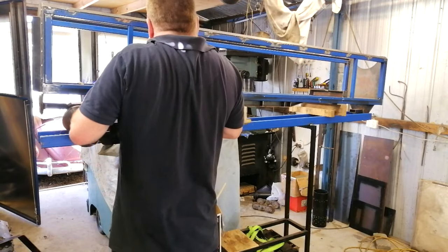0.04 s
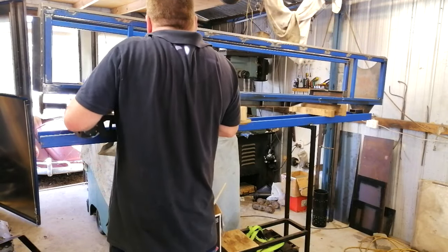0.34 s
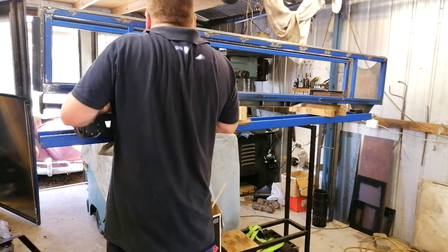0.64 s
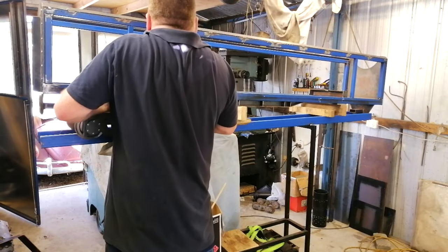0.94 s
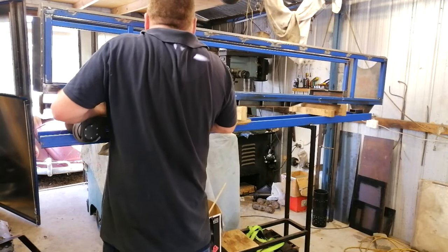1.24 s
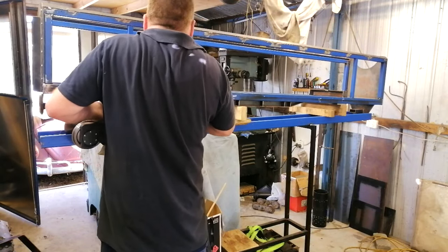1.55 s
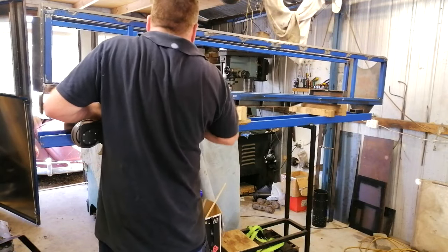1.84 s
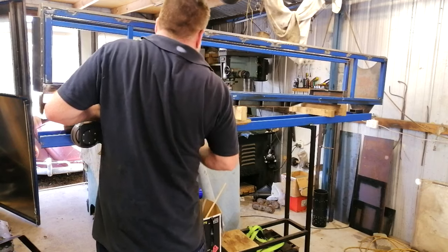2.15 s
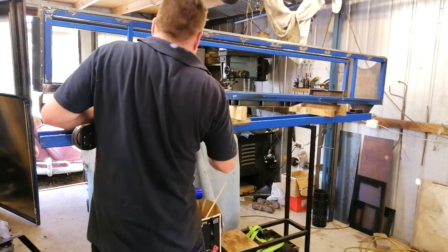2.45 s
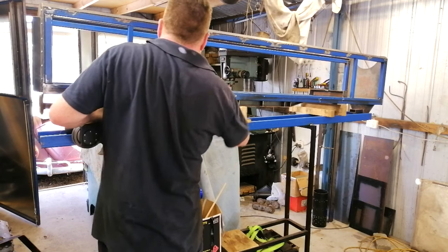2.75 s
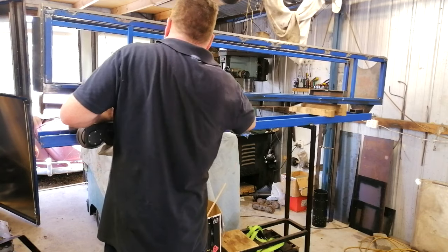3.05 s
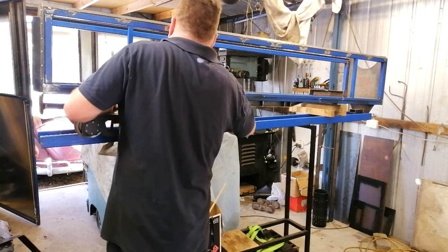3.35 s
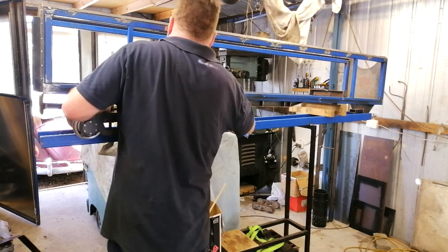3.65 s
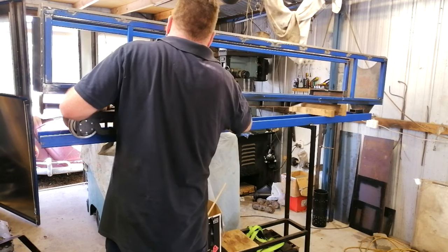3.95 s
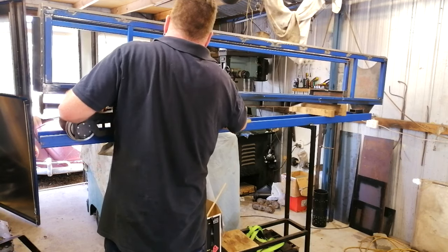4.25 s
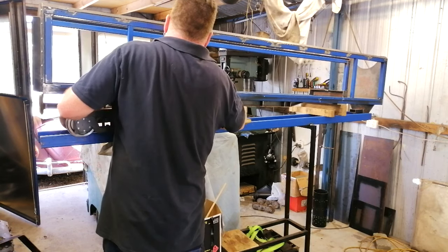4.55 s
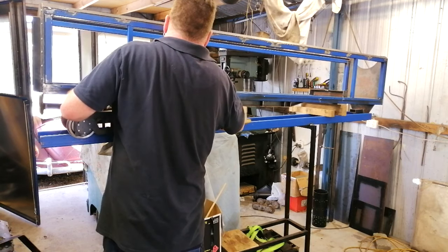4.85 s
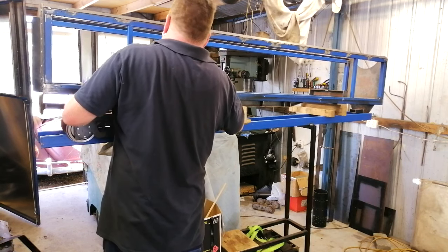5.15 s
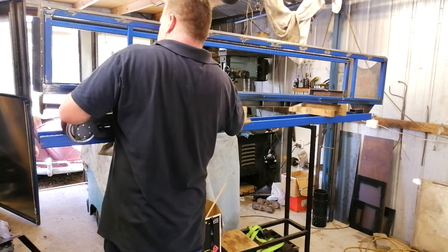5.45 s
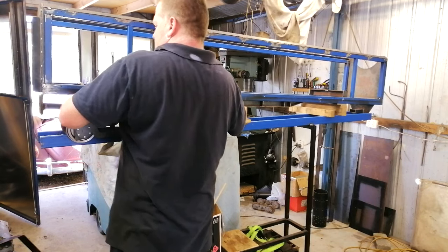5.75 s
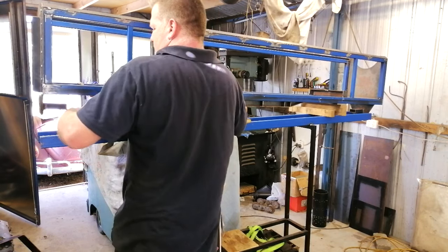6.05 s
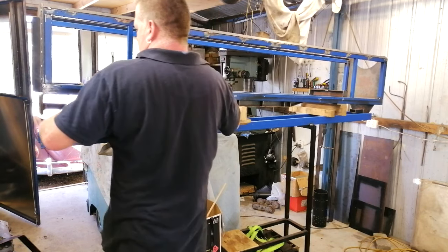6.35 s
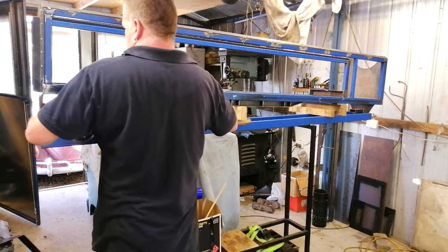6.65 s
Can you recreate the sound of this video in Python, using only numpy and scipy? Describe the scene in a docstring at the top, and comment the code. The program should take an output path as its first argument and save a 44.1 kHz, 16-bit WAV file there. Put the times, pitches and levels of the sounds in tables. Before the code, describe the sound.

Irregular metal clunks with a short ring and a grinding scrape as a wheeled undercarriage is shoved under a steel frame.

```python
"""In a workshop, a small locomotive bogie (a wheeled undercarriage) is shoved under a steel frame.
Its side plates, wheels and axle clunk against the frame: each knock makes the steel clatter, then ring.
Dragged along a steel beam, it grinds in tiny slips; a sleeve or hand swishes, and small parts clink.
The fitter's body is in the way, so most of the sound arrives off the walls, over a faint low rumble."""
import sys
import numpy as np
from scipy import signal
from scipy.fft import rfft, irfft, next_fast_len
from scipy.io import wavfile
from scipy.ndimage import uniform_filter1d

SR = 44100
rng = np.random.default_rng(int(sys.argv[2]) if len(sys.argv) > 2 else 0)


def to_wav(sig):
    """Store sig (one row per channel, or 1-D mono) as 16-bit WAV at the path in sys.argv[1].

    Samples outside -1..1 are clipped; the rate is SR.
    """
    pcm = np.clip(np.atleast_2d(sig), -1, 1) * 32767
    pcm = np.round(pcm).astype(np.int16)
    wavfile.write(sys.argv[1], SR, pcm.T)  # frames by channels


N = 296060


def amp(db):
    """Turn decibels into a number to multiply by."""
    return 10 ** (np.asarray(db) / 20)


def unit(x):
    """Scale x to an average (rms) level of 1."""
    return x / np.sqrt(np.mean(x ** 2) + 1e-20)


def along(points, hz):
    """Read between a table's (frequency, value) rows, on a pitch-like scale."""
    f, value = np.transpose(points)
    return np.interp(np.log(hz + 1), np.log(f + 1), value)


def filtered(x, response):
    """Turn each frequency in x up or down by response(hz)."""
    n = x.shape[-1]
    padded = next_fast_len(n + SR // 4)
    return irfft(rfft(x, padded) * response(np.fft.rfftfreq(padded, 1 / SR)), padded)[..., :n]


# How alike the two ears hear the room: f/Hz, likeness (1 = the same)
EAR_LIKENESS = [(30, .9), (125, 0.75), (300, 0.75), (600, 0.5), (1200, 0.017), (2000, 0.0052),
                (4000, -0.045), (12000, 0.026)]
def diffuse(size):
    """Noise from all around: alike at both ears in the bass, unrelated in the treble."""
    def shares(hz):
        likeness = along(EAR_LIKENESS, hz)
        return np.sqrt([(1 + likeness) / 2, (1 - likeness) / 2])
    mid, side = filtered(rng.standard_normal((2, size)), shares)
    return np.array([mid + side, mid - side])


# The tone of the quiet workshop: f/Hz, level/dB
ROOM_COLOUR = [(12, -38), (21, -6), (29, -1.5), (37, -9), (64, -11), (92, -19.5), (150, -21.5),
               (191, -22.5), (230, -24.5), (360, -27), (600, -30), (924, -30.5), (3700, -42), (9000, -52.5),
               (15000, -61)]
def room_tone(level_db=-59):
    """A low rumble and faint hiss come in by the open door."""
    return amp(level_db) * unit(filtered(diffuse(N), lambda hz: amp(along(ROOM_COLOUR, hz))))


# How long echoes take to fade by 60 dB: f/Hz, fade/s
ECHO_FADE = [(100, 0.9), (260, 0.36), (700, 0.31), (1800, 0.25), (4800, 0.34), (12800, 0.24)]
def room_echo(hold_s=0.027, build_s=0.0026, lumpy_db=1.5, slap=0.072):
    """Near walls slap the sound back; uneven echoes hold its level, then die away."""
    hz, t, bands = signal.stft(diffuse(SR * 3 // 4), SR, nperseg=256)
    fade = amp(-60 * np.maximum(t - hold_s, 0) / along(ECHO_FADE, hz)[:, None])
    tail = signal.istft(bands * fade, SR, nperseg=256)[1]
    t = np.arange(tail.shape[1]) / SR
    lumps = unit(uniform_filter1d(rng.standard_normal(len(t)), size=40))
    tail = tail * amp(lumpy_db * lumps) * (1 - np.exp(-t / build_s))
    tail /= np.sqrt(np.sum(tail ** 2) / 2)
    for delay_s in np.linspace(.003, .027, 6) + rng.uniform(0, .003, 6):
        at = round(delay_s * SR)
        lag = rng.integers(-8, 9)  # a slap can reach one ear first
        tail[[0, 1], [at + lag, at - lag]] += slap * rng.choice([-1, 1])
    return tail / np.sqrt(np.sum(tail ** 2) / 2)


def friction(colour, slips_per_s, uneven_db):
    """Rubbing surfaces move in tiny slips of uneven size, each echoing round the room."""
    slips = (rng.random(N) < slips_per_s / SR) * rng.choice([-1, 1], N)
    sizes = amp(uneven_db * rng.standard_normal(N))
    heard = signal.fftconvolve((slips * sizes)[None], room_echo(), axes=1)[:, :N]
    return unit(filtered(heard, lambda hz: amp(along(colour, hz))))


# The tone of the grind and of the hiss: f/Hz, level/dB
GRIND_COLOUR = [(40, -34), (75, -12.5), (175, -10), (214, 2.5), (250, -9), (320, -7), (443, 2.5),
                (534, -0.5), (585, -0.5), (650, -2), (900, 0), (1840, -11.5), (4000, -22), (6000, -65.5)]
HISS_COLOUR = [(600, -25), (1500, 4), (2800, 1.5), (5000, 0), (7200, -4.5), (8500, -10), (11800, -17),
               (13300, -34.5), (15000, -36.5)]
# Scrapes and soft swishes: t/s at full speed, rise/s, hold/s, grind level/dB, hiss level/dB
RUBS = [ (0.578, 0.15, 0.035, -40, -50), (0.683, 0.094, 0.019, -50, -57), (1.044, .16, 0.057, -71, -58.5),
        (1.153, 0.046, 0.062, -40.5, -62), (2.036, .015, 0.043, -66.5, -76),
        (2.61, 0.063, 0.0046, -59, -52.5), (3.0, .3, 0.086, -69, -71), (3.095, 0.097, .015, -63, -76),
        (3.998, 0.058, .05, -51, -83), (4.08, 0.048, 0.032, -38, -56), (4.117, .04, 0.099, -32, -44),
        (4.22, 0.035, 0.091, -34, -36.3), (4.345, 0.17, .02, -40, -41.5),
        (4.415, 0.11, 0.027, -46.5, -49.5), (4.82, 0.086, .01, -51.5, -49.5),
        (4.946, .03, 0.017, -36, -47.5), (4.988, 0.046, 0.068, -42, -55.5),
        (5.208, 0.082, 0.0052, -39, -45.5), (6.093, 0.085, .005, -62, -64.5)]
def scrapes_and_swishes(rise_db=23, sag_db_per_s=7, release_db_per_s=191):
    """Steel dragging, with a faint brush of sleeve or hand; each rub swells, holds and dies away."""
    grind, hiss = np.zeros(N), np.zeros(N)
    for peak_s, rise_s, hold_s, grind_db, hiss_db in RUBS:
        t = np.arange(N) / SR - peak_s
        rub_db = rise_db * np.minimum(t, 0) / rise_s
        rub_db -= sag_db_per_s * np.clip(t, 0, hold_s)
        rub_db -= release_db_per_s * np.maximum(t - hold_s, 0)
        grind = np.maximum(grind, amp(rub_db + grind_db))
        hiss = np.maximum(hiss, amp(rub_db + hiss_db))
    return (grind * friction(GRIND_COLOUR, slips_per_s=500, uneven_db=3)
            + hiss * friction(HISS_COLOUR, slips_per_s=630, uneven_db=5))


def causal(gain):
    """Make a (minimum-phase) filter with this gain, so nothing sounds ahead of a knock."""
    cepstrum = irfft(np.log(np.maximum(gain, 1e-6)))
    half = len(cepstrum) // 2
    return np.exp(rfft(np.r_[cepstrum[0], 2 * cepstrum[1:half], np.zeros(half)]))


def knock_force(db, contact_ms, tilt_db, leak_hz, fall_db_per_octave=18):
    """A knock's strength by frequency: a longer contact is duller, and bass slips round a narrow part."""
    hz = np.geomspace(210, 9900, 24)
    dulling_db = fall_db_per_octave / 6 * np.log2(1 + (hz * contact_ms / 1000) ** 6)
    leak_db = 15 * np.log10(1 + (leak_hz / hz) ** 2)
    return np.column_stack([hz, db + tilt_db * np.log2(hz / 1000) - dulling_db - leak_db])


def ring(notes, force, scatter_db=1, waver_rad=0.66, attack_s=0.016):
    """A part's own notes ring as hard as the knock feeds them; echoes make them waver at each ear."""
    t = np.arange(SR) / SR
    out, waver_times = np.zeros((2, SR)), np.linspace(0, 1, 40)
    for hz, db, fade_s in notes:
        start_db = db + along(force, hz) + scatter_db * rng.standard_normal()
        ear_gap = np.arccos(along(EAR_LIKENESS, hz)) * np.array([[.5], [-.5]])
        phases = rng.uniform(0, 2 * np.pi) + ear_gap * rng.choice([-1, 1])
        phases = phases + waver_rad * rng.standard_normal((2, len(waver_times)))
        waver = np.array([np.interp(t, waver_times, ear) for ear in phases])
        out += amp(start_db - 60 * t / fade_s) * np.sin(2 * np.pi * hz * t + waver)
    return out * (1 - np.exp(-t / attack_s))


# The tone shared by all the clatter: f/Hz, level/dB
CONTACT_COLOUR = [(40, -21), (100, -10), (160, 0), (260, -1.5), (400, 1), (560, 0), (820, 3.5), (1200, 2),
                  (2600, 2), (3800, 1), (7400, 0.5), (8500, -1.5), (11200, 0.5), (12200, -9), (13200, -15),
                  (15000, -19.5)]
# Every knock: t/s, part struck, level/dB, contact time/ms, treble tilt/(dB per octave), ring level/dB
KNOCKS = [ (0.452, "plate", -26.5, .28, -3, -9.5), (0.477, "plate", -19.5, .18, -2.5, -13),
          (0.493, "plate", -23, .22, -1, -22), (1.084, "wheel", -13, 0.23, -3, -22),
          (1.189, "wheel", -25.5, 0.23, -5.2, -22.5), (1.515, "beam", -31, 0.4, -1.5, -13.5),
          (1.704, "frame", -17.5, 0.24, -4.5, -24.5), (2.243, "tool", -56.5, 0.13, -2.8, -17),
          (2.729, "tool", -35, 0.21, -2.5, -13), (2.743, "tool", -39, .12, -0.25, -32),
          (3.232, "tool", -55.5, 0.055, -4, -30), (3.459, "bolt", -42, 0.12, -0.56, -13),
          (3.551, "plate", -11.5, 0.23, -2, -18.5), (3.86, "beam", -18, 0.21, -3.5, -20.5),
          (4.184, "plate", -21.5, 0.19, -4, -27), (4.464, "beam", -14, 0.2, -5, -17.5),
          (4.822, "wheel", -11, 0.28, -.5, -14.5), (4.848, "wheel", -9.5, 0.18, -3, -18),
          (5.134, "axle", -14.5, .21, -1.34, -14.5), (6.215, "tool", -42.5, 0.081, -5, -31),
          (6.247, "tool", -49, 0.14, -1.5, -12.5)]
def knocks(part, humps, notes, clatter_db, ripple_db, leak_hz):
    """Each knock stirs a crowd of short vibrations that clatter round the room; a few notes ring on."""
    out = np.zeros((2, N))
    hz = np.fft.rfftfreq(SR, 1 / SR)
    # the clatter has humps where vibrations crowd together and dips where they leave a gap
    humps_db = sum(db * np.exp(-((hz - centre) / width) ** 2) for centre, width, db in humps)
    for time_s, struck, db, contact_ms, tilt_db, ring_db in KNOCKS:
        if struck != part:
            continue
        force = knock_force(db, contact_ms, tilt_db, leak_hz)
        # each spot that is hit favours different vibrations
        ripple = uniform_filter1d(uniform_filter1d(rng.standard_normal(len(hz)), size=70), size=40)
        spot_db = ripple_db * unit(ripple) * hz / (hz + 1100)
        colour = causal(amp(along(force, hz) + along(CONTACT_COLOUR, hz) + humps_db + spot_db))
        clatter = amp(clatter_db) * np.sqrt(SR / 20) * irfft(rfft(room_echo(), SR) * colour)
        sound = clatter + amp(ring_db) * ring(notes, force)
        start = round((time_s - .0015) * SR)  # the parts touch just before full force
        out[:, start:start + SR] += sound[:, :N - start]
    return out


TOOL_HUMPS = [(300, 66, 3.5), (501, 13, 6), (1140, 83, -6), (2940, 1800, 2)]  # clatter: f/Hz, width/Hz, level/dB
TOOL_NOTES = [(498, 12, 0.15), (2010, 6.5, 0.21), (5210, -7, .7), (11030, 2, 0.65)]  # ringing: f/Hz, level/dB, fade/s
def tool():
    """Light, quick taps make a tool clink."""
    return knocks("tool", TOOL_HUMPS, TOOL_NOTES, clatter_db=-5, ripple_db=3, leak_hz=79.7)


BOLT_HUMPS = [(854, 61, 7), (1360, 320, -6), (3950, 440, 4), (8300, 150, -10)]  # clatter: f/Hz, width/Hz, level/dB
BOLT_NOTES = [(790, -1, 0.96), (1790, -7, 0.44), (2105, -8, 0.65), (2950, 4, .3), (4040, 6, 0.42),
              (3800, 11, 0.57), (4667, -11, .2), (5469, 4.5, 0.36), (7200, 7, 0.31), (7811, 8, 0.26),
              (8678, 3, 0.22), (9760, 1, 0.5), (10500, 4, .12), (10970, -1, .36), (12900, 0, .29)]  # ringing: f/Hz, level/dB, fade/s
def bolt():
    """One small tap sets a bolt ringing brightly."""
    return knocks("bolt", BOLT_HUMPS, BOLT_NOTES, clatter_db=-6, ripple_db=6.5, leak_hz=400)


FRAME_HUMPS = [(360, 120, 3), (900, 190, 8.5), (2270, 140, 0.5), (4200, 2050, -7), (11000, 1500, 7)]  # clatter: f/Hz, width/Hz, level/dB
FRAME_NOTES = [(376, -9, 0.28), (585, -1, 0.32), (890, -4, 0.42), (950, -3, .55), (1160, 3, 0.31),
               (2140, 2, 0.34), (3540, 3, 0.43)]  # ringing: f/Hz, level/dB, fade/s
def frame():
    """The steel frame takes one knock and rings faintly."""
    return knocks("frame", FRAME_HUMPS, FRAME_NOTES, clatter_db=-5, ripple_db=3, leak_hz=644)


BEAM_HUMPS = [(697, 75, 9), (1300, 88, 2), (2330, 190, -2), (3050, 450, -6), (3750, 100, 5.5),
              (4200, 210, -1.5), (5690, 320, 1.5)]  # clatter: f/Hz, width/Hz, level/dB
BEAM_NOTES = [(361, -6.5, 0.39), (593, -2, 0.33), (741, -11, 0.51), (790, -6.5, 0.47), (954, 2, 0.34),
              (1166, -12, 0.78), (1650, -11, 0.21), (2010, 0.5, 0.33), (2140, -2, 0.34), (3570, 2, 0.46),
              (3650, 0, 0.37), (3740, 0.5, 0.33), (3950, 1.5, .38), (4000, -4.5, 0.29), (5200, -8.5, 0.61),
              (10960, -9, 0.94)]  # ringing: f/Hz, level/dB, fade/s
def beam():
    """The steel beam clangs as it is bumped."""
    return knocks("beam", BEAM_HUMPS, BEAM_NOTES, clatter_db=-5, ripple_db=3.5, leak_hz=545)


AXLE_HUMPS = [(758, 67, 7), (1530, 290, -0.5), (2100, 50, 9.5), (2570, 180, 7), (2930, 100, 10),
              (3270, 130, -5), (3380, 150, 12.5), (3840, 97, 9), (4500, 61, -9), (4500, 70, -5),
              (5140, 560, -4)]  # clatter: f/Hz, width/Hz, level/dB
AXLE_NOTES = [(502, -7, 0.39), (744, -12, 0.32), (789, -15, 0.36), (877, -11.5, 0.69), (1854, -6, .3),
              (2133, -7.5, 0.23), (2580, -2.5, 0.25), (2952, -6, .2), (3386, 3, 0.42), (3690, -1, .3),
              (4111, -12, .15), (4500, -5, 0.32), (4524, 4, 0.32), (4580, 2, 0.38), (6270, -5.5, .2),
              (6616, -9, .2), (8960, -3, .24), (9222, 1.5, .18), (9970, 9, 0.189), (10970, 5, .2)]  # ringing: f/Hz, level/dB, fade/s
def axle():
    """The axle hits the frame once, with a high ring."""
    return knocks("axle", AXLE_HUMPS, AXLE_NOTES, clatter_db=-7.5, ripple_db=4, leak_hz=430)


PLATE_HUMPS = [(284, 16, 4.5), (574, 14, -6), (850, 37, -2), (1084, 99, 2), (1540, 46, 4),
               (3300, 500, -1.5), (4450, 250, -5)]  # clatter: f/Hz, width/Hz, level/dB
PLATE_NOTES = [(270.7, -4, 0.49), (582, 1.5, 0.37), (795, -5, 0.52), (913, -6, 0.36), (906, -7.5, 0.57),
               (1020, -13, 0.27), (1570, -27, 0.38), (1707, -5.5, 0.4), (1945, -15, 0.42), (1970, -8, 0.43),
               (2150, -17, 0.59), (3400, -6, 0.5), (3510, -10.5, .5), (3530, -4, 0.43), (4020, -13.5, 0.47),
               (5530, -5.5, 0.28)]  # ringing: f/Hz, level/dB, fade/s
def plates():
    """The side plates clunk against the frame, with a lower ring."""
    return knocks("plate", PLATE_HUMPS, PLATE_NOTES, clatter_db=-5, ripple_db=3, leak_hz=400)


WHEEL_HUMPS = [(348, 31, 5), (1580, 86, 7), (1940, 69, -2.5), (2400, 490, -2.5), (3760, 270, -3),
               (4430, 72, -4), (4900, 740, -2), (5780, 57, 4), (5900, 90, 3)]  # clatter: f/Hz, width/Hz, level/dB
WHEEL_NOTES = [(377.5, -7.5, .6), (445, -7, 0.37), (1520, -7, 0.26), (1760, -2, 0.43), (1790, -2.5, 0.33),
               (1855, 0, 0.31), (2100, -5.5, .5), (2745, -11, 0.52), (3420, -7, 0.57), (3631, -2, 0.58),
               (3646, 1.5, 0.33), (3750, 2.5, .34), (3830, 1.5, 0.36), (3883, 2.5, .34), (4030, -10.5, .45),
               (4371, -0.5, 0.4), (4600, -5, 0.36), (4974, -6.5, .3), (5470, -0.5, .3), (5755, 3, 0.22),
               (6020, -4, 0.2), (6960, 0, .26), (8802, -2, .24), (10280, 4.5, .2)]  # ringing: f/Hz, level/dB, fade/s
def wheels():
    """The wheels hit the frame in hard double knocks and ring with many notes."""
    return knocks("wheel", WHEEL_HUMPS, WHEEL_NOTES, clatter_db=-7, ripple_db=3.5, leak_hz=444)


def scene():
    """Knocks on each part, scrapes, swishes and the quiet room, added together."""
    struck = plates() + wheels() + beam() + frame() + axle() + bolt() + tool()
    return struck + scrapes_and_swishes() + room_tone()


# How much louder the left side is than the right: f/Hz, level/dB
LEFT_OVER_RIGHT = [(100, 0), (300, -0.2), (600, -2), (1200, -0.5), (4500, 0), (8000, 2.5), (12000, -7)]
def record(dry, top_hz=15100):
    """Left and right get slightly different tones, and the highest treble is cut off."""
    def response(hz):
        balance = amp(np.outer([.5, -.5], along(LEFT_OVER_RIGHT, hz)))
        treble_cut = np.clip((top_hz - hz) / 200 + .5, 0, 1)
        return balance * treble_cut
    return filtered(dry, response)


dry = scene()
out = record(dry)
to_wav(out)
```